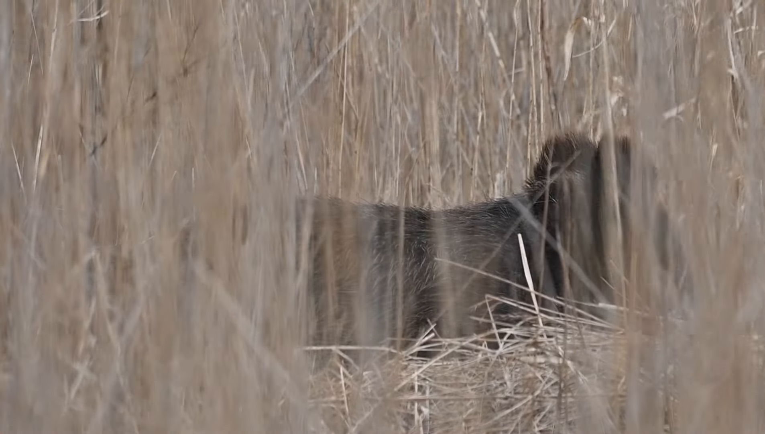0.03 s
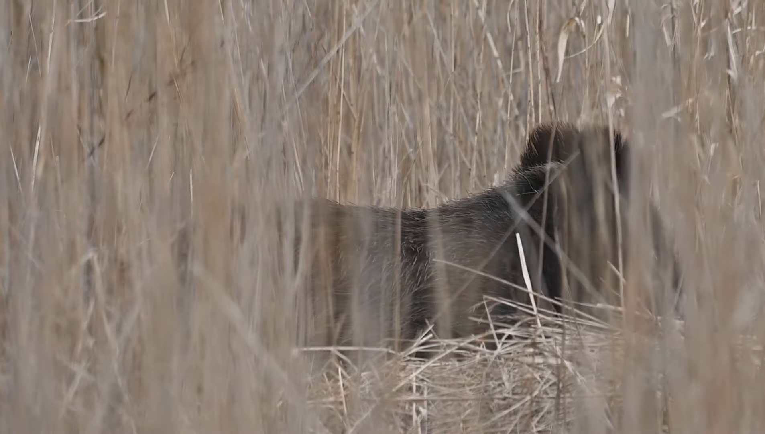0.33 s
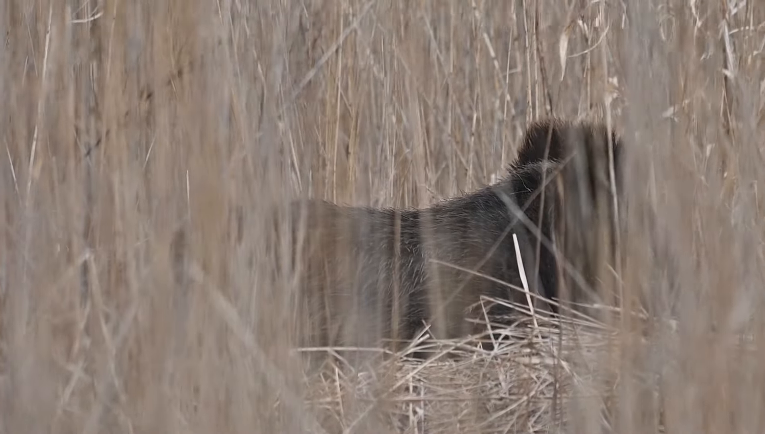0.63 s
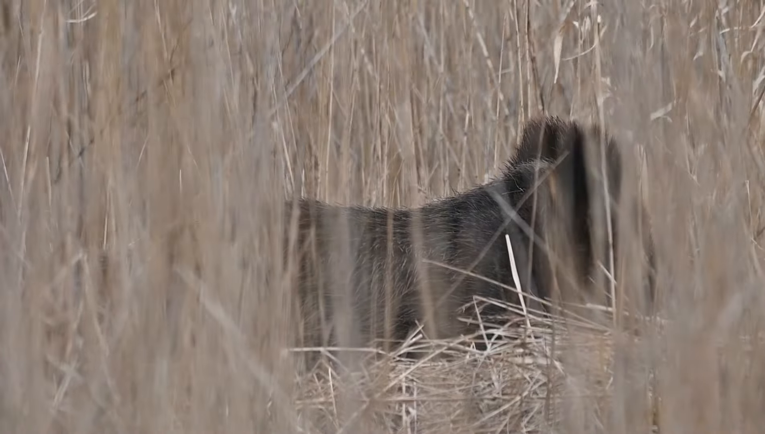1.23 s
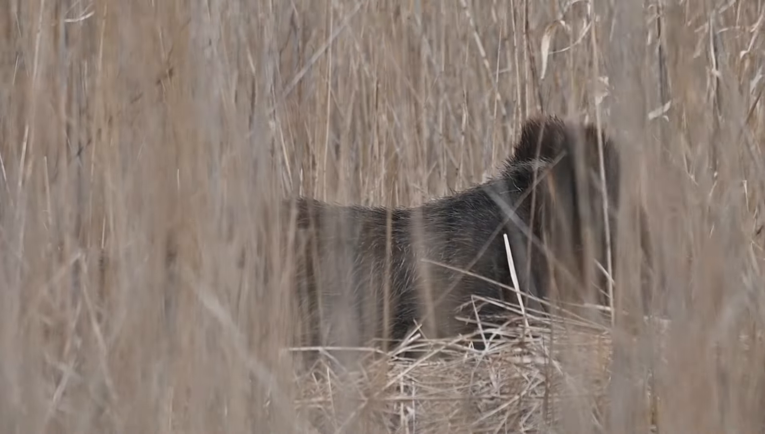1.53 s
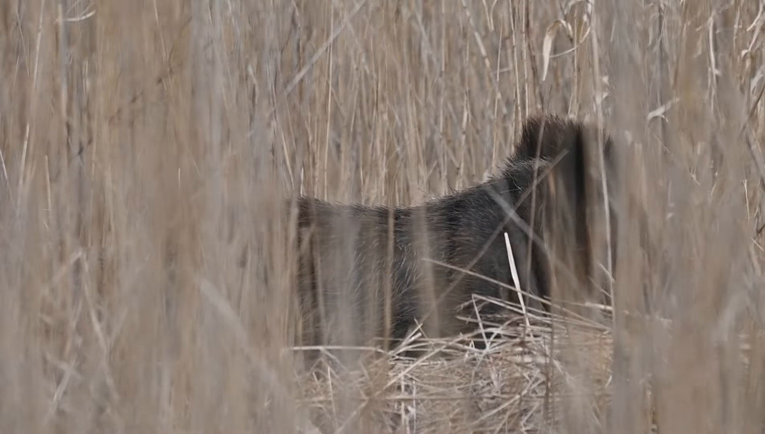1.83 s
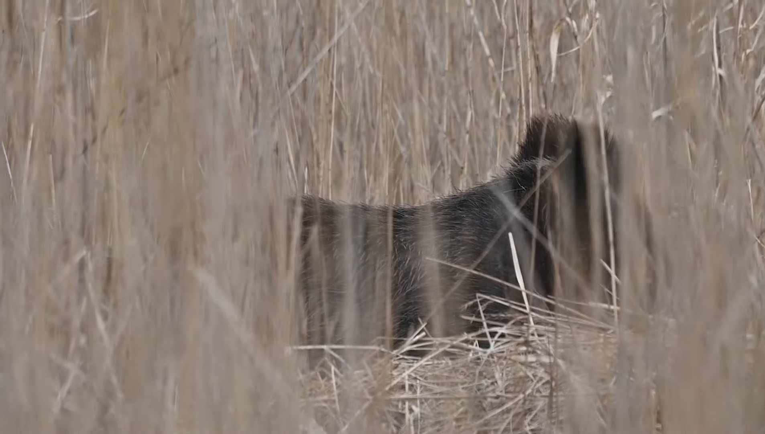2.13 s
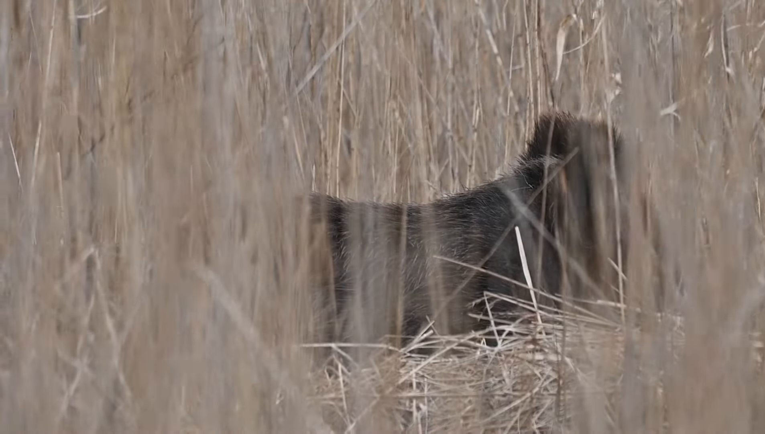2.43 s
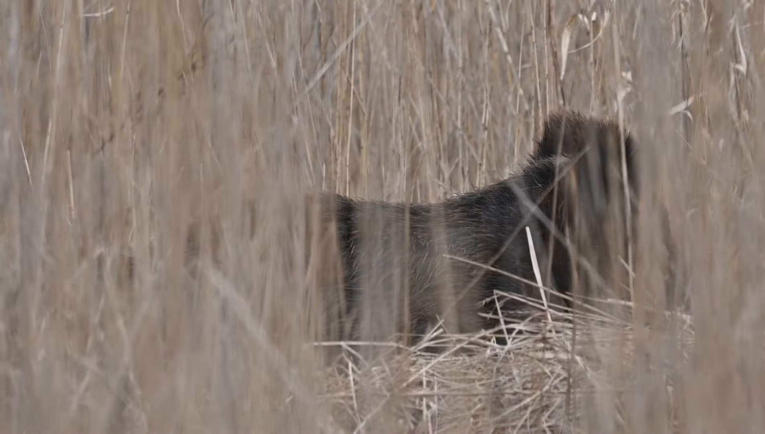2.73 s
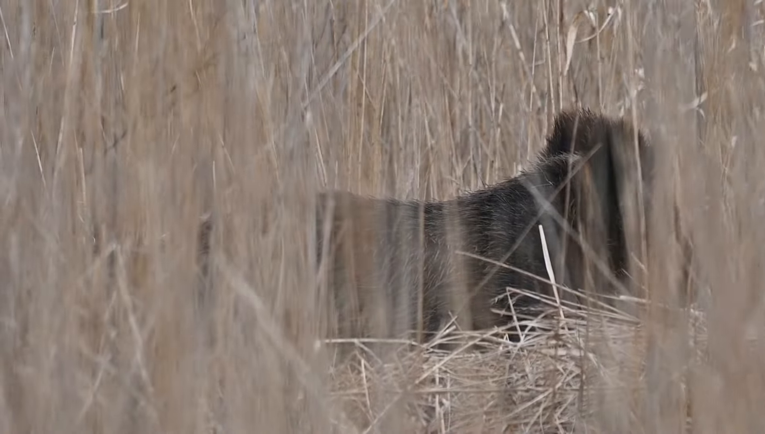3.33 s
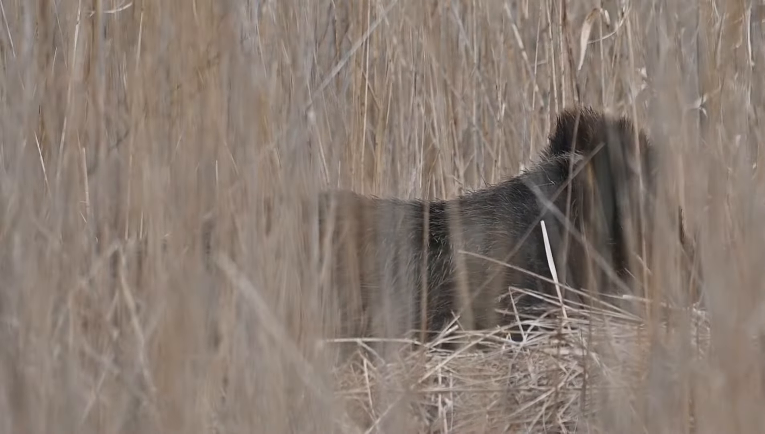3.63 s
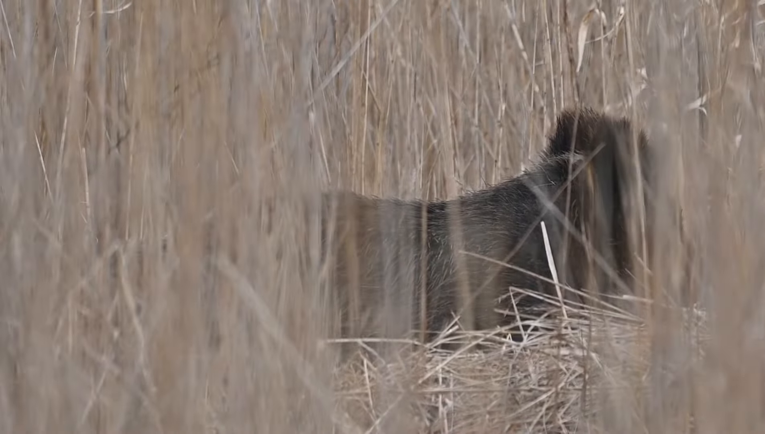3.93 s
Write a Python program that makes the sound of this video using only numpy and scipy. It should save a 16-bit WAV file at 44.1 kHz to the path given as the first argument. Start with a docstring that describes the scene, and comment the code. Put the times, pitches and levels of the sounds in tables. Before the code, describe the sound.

Light wind rumbles on the microphone in a quiet reed bed, easing at first, then gusting and thumping mostly on the right. Dry reeds swish faintly, while the camera whirs softly on the left and clicks once.

```python
"""Light gusts rumble and thump on a camera's two microphone ports, mostly the right, in a quiet reed bed.
The turbulence grows brighter as each gust strengthens. Dry reeds brush past in short, soft swishes.
On the left, the camera's mechanism whirs and buzzes faintly over microphone hiss;
its body clicks once, and there is one soft scuff of handling."""
import sys
import numpy as np
from scipy import signal
from scipy.fft import rfft, irfft
from scipy.io import wavfile

SR = 44100
rng = np.random.default_rng(int(sys.argv[2]) if len(sys.argv) > 2 else 0)


def transcribe(u):
    """Save the signal u as a 16-bit wav file named by the first command-line argument.

    u: samples, shape (n,) or (channels, n), limited to [-1, 1]; the rate is SR.
    q: integer samples, one column per channel.
    """
    v = np.clip(np.atleast_2d(u).T, -1, 1)
    q = np.round(v * 32767).astype(np.int16)
    wavfile.write(sys.argv[1], SR, q)


N = 176400
BIN_HZ = np.arange(N // 2 + 1) * SR / N


def undb(db):
    return 10 ** (np.asarray(db) / 20)


def unit(x):
    """Scale to rms 1."""
    return x / np.sqrt(np.mean(x ** 2))


def db_at(spectrum, hz):
    """Read a spectrum on a log-frequency axis."""
    points_hz, db = np.array(spectrum, float).T
    return np.interp(np.log(np.maximum(hz, 1)), np.log(points_hz), db)


def colour(x, spectrum):
    """Filter by a spectrum that falls away past its ends; rms 1."""
    hz = np.maximum(BIN_HZ, 1)
    skirts = np.minimum(hz / spectrum[0][0], 1) ** 2 * np.minimum(spectrum[-1][0] / hz, 1) ** 2
    return unit(irfft(rfft(x) * undb(db_at(spectrum, hz)) * skirts, N))


def noise():
    return rng.standard_normal(N)


def wander(rate_hz):
    """Smooth random motion; rms 1."""
    return unit(irfft(rfft(noise()) * np.exp(-.5 * (BIN_HZ / rate_hz) ** 2), N))


def decay(age, tau_s):
    """Silence before age 0, then exponential decay."""
    return (age >= 0) * np.exp(-np.maximum(age, 0) / tau_s)


def on_left(x, right_db):
    """Mono to stereo, right channel attenuated."""
    return np.outer([1, undb(right_db)], x)


# Hiss spectrum (frequency [Hz], relative density [dB])
HISS_SPECTRUM = [(30, 17.5), (150, 11), (300, 10), (650, 5), (800, -1.5), (1200, 1), (2500, -2), (5000, -3),
                 (8000, -5.5), (10500, -5), (12500, -13), (13500, -14), (14500, -25)]


def microphone_hiss(left_db=-76, right_db=-78):
    """Steady self-noise, independent in each microphone."""
    return np.array([undb(db) * colour(noise(), HISS_SPECTRUM) for db in (left_db, right_db)])


# Whirr spectrum (frequency [Hz], relative density [dB])
WHIRR_SPECTRUM = [(100, -24.5), (200, -11), (250, -18), (290, -11), (335, -4), (365, -10), (400, -3),
                  (465, 1), (525, -12.5), (570, -11), (690, -8.5), (780, -20), (1150, -29), (1300, -35),
                  (1550, -29), (2200, -53)]
# Mechanism resonances (frequency [Hz], half-width [Hz], left level [dB], right level [dB])
WHINE_RESONANCES = [(874, 27, -83.5, -82.5), (1002.5, 10, -84, -94.5), (7190, 540, -83.5, -103),
                    (9180, 400, -90, -104), (14100, 83, -94.5, -104)]


def mechanism_whirr(whirr_db=-66):
    """The camera's mechanism whirs low and whines at narrow resonances."""
    out = on_left(undb(whirr_db) * colour(noise(), WHIRR_SPECTRUM), right_db=-22)
    for hz, half_width_hz, left_db, right_db in WHINE_RESONANCES:
        resonance = 1 / (1 + ((BIN_HZ - hz) / half_width_hz) ** 2)
        for port, db in enumerate((left_db, right_db)):
            out[port] += undb(db) * unit(irfft(rfft(noise()) * resonance, N))
    return out


# Buzz spectrum per port (frequency [Hz], relative density [dB])
BUZZ_LEFT_SPECTRUM = [(2000, -28.5), (4000, -16), (4850, -9), (5500, -9), (6500, -7), (7050, 4.5),
                      (7400, -2), (7900, -21), (8700, -20), (9200, -16.5), (9800, -11.5), (11000, -14),
                      (13000, -21)]
BUZZ_RIGHT_SPECTRUM = [(6000, -52), (7200, -26), (8000, -11), (8700, 8), (9200, 20.5), (9900, -14),
                       (10800, -27), (13000, -16)]


def mechanism_buzz(t, rate_hz=119.88, offset_s=0.0047, weak_db=-3, left_db=-80.5, right_db=-89):
    """The mechanism buzzes in alternately weak and strong bursts of fine hiss."""
    cycle = (t - offset_s) * rate_hz
    bursts = decay(cycle % 1 / rate_hz, tau_s=0.0014) * undb(weak_db * (cycle % 2 < 1))
    jolt = noise()[(cycle % 2 / rate_hz * SR).astype(int)]  # repeats every two bursts
    drive = bursts * (jolt + 0.19 * noise())
    return np.array([undb(left_db) * colour(drive, BUZZ_LEFT_SPECTRUM),
                     undb(right_db) * colour(drive, BUZZ_RIGHT_SPECTRUM)])


# Scuff spectrum (frequency [Hz], relative density [dB])
SCUFF_SPECTRUM = [(250, -14), (380, -9), (600, -15), (1250, -15), (1550, 3), (1800, -5), (2100, -8),
                  (2450, -30)]


def handling_scuff(t, at_s=3.291, level_db=-66):
    """A soft, short scuff of handling near the left port."""
    scuff = colour(noise(), SCUFF_SPECTRUM) * decay(t - at_s, tau_s=0.0078)
    return on_left(undb(level_db) * scuff, right_db=-12)


# Camera body modes (frequency [Hz], relative level [dB], T60 [s])
BODY_MODES = [(570, -0.5, 0.054), (1120, 1, .028), (1424, -1, 0.028), (1490, 1.5, 0.02), (2230, -12, 0.021),
              (3100, -17, .014)]
# Crack spectrum (frequency [Hz], relative density [dB])
CRACK_SPECTRUM = [(450, 2), (900, 0), (2200, -6), (3200, -9), (6500, -5), (9000, -14), (11500, -27)]


def body_click(t, at_s=1.7476, ring_db=-55, crack_db=-53.5):
    """A sharp crack briefly rings the camera body."""
    age = t - at_s
    ring = sum(undb(db) * decay(age, t60_s / np.log(1000)) * np.sin(2 * np.pi * hz * age)
               for hz, db, t60_s in BODY_MODES)
    crack = colour(noise(), CRACK_SPECTRUM) * decay(age, tau_s=0.0013)
    return on_left(undb(ring_db) * ring + undb(crack_db) * crack, right_db=-12)


# Leaf swishes (peak time [s], level [dB], swell [s], fade [s])
REED_SWISHES = [(0.17, -79, 0.18, 0.055), (0.98, -85.5, 0.046, 0.062), (2.32, -75, 0.04, 0.014),
                (2.389, -70.5, 0.024, 0.033), (2.521, -72.5, 0.013, .012), (2.955, -73.5, 0.027, 0.014),
                (3.12, -65, 0.029, 0.013), (3.225, -71, 0.032, .018), (3.54, -69, .008, 0.024),
                (3.76, -69.5, .022, .025), (3.875, -75, 0.017, 0.04)]
# Stalk ticks (time [s], level [dB])
STALK_TICKS = [(1.793, -63), (2.419, -67), (2.43, -60.5)]
# Reed spectrum (frequency [Hz], relative density [dB])
REED_SPECTRUM = [(1200, -7.5), (2500, -9), (3050, -7), (3300, 3), (3650, -4.5), (5200, 1), (7200, 1),
                 (10000, -7), (12000, -24), (14500, -30)]


def reeds(t, grain_db=1.5, right_db=-32):
    """Dry leaves slide in grainy swishes; stalks tick now and then."""
    rub = sum(undb(db) * np.exp(-.5 * ((t - at_s) / np.where(t < at_s, swell_s, fade_s)) ** 2)
              for at_s, db, swell_s, fade_s in REED_SWISHES)
    ticks = sum(undb(db) * decay(t - at_s, tau_s=0.00084) for at_s, db in STALK_TICKS)
    grain = unit(undb(grain_db * wander(rate_hz=270)))
    envelope = rub * grain + ticks
    return np.array([colour(noise(), REED_SPECTRUM) * envelope * gain for gain in (1, undb(right_db))])


# Single eddies (time [s], level [dB], rise [s])
EDDY_THUMPS = [(2.1078, -36.5, 0.00027), (2.1302, -30, 0.00026), (2.197, -28.5, 0.00086),
               (2.300, -32.5, 0.00047), (2.342, -31.5, 0.00062), (2.38, -31.5, 0.00028),
               (2.425, -31.5, 0.00093), (2.831, -36.5, 0.00043), (2.877, -31.5, 0.00061)]
# Turbulence around each eddy (frequency [Hz], relative density [dB])
SWIRL_SPECTRUM = [(200, -2), (450, 3), (750, -3.5), (1200, -19.5), (2000, -30)]


def eddy_thumps(t, suction=0.44, relax_s=0.004, swirl_db=-22.5, swirl_s=0.0089):
    """An eddy sucks at the port, then the pressure jumps and relaxes amid a short swirl."""
    swirl = undb(swirl_db) * colour(noise(), SWIRL_SPECTRUM)
    out = np.zeros(N)
    for at_s, db, rise_s in EDDY_THUMPS:
        jump = .5 + .5 * np.tanh((t - at_s) / rise_s)
        away_s = np.hypot(t - at_s, rise_s)
        pressure = (jump - suction * (1 - jump)) * np.exp(-away_s / relax_s)
        out += undb(db) * (pressure + swirl * np.exp(-away_s / swirl_s))
    return out


# Gusts per port (time [s], level before trim [dB])
LEFT_GUSTS = [(0, -84), (0.22, -72.5), (0.38, -66.5), (0.42, -53), (0.48, -60.5), (0.8, -75), (1.7, -84),
              (1.86, -57.5), (1.899, -43.5), (2.0, -43), (2.14, -49), (2.208, -34.5), (2.29, -60),
              (2.42, -59), (2.5, -45), (2.559, -37), (2.62, -62), (3.102, -67), (3.7, -64.5), (4.0, -60.5)]
RIGHT_GUSTS = [(0, -53), (0.082, -49.5), (0.2, -67.5), (0.55, -62), (1.07, -68.5), (1.16, -73.5),
               (1.39, -76.5), (1.47, -61), (1.68, -74), (1.88, -63.5), (1.94, -42), (2.22, -40),
               (2.32, -37), (2.58, -40), (2.739, -46.5), (2.819, -41), (3.02, -39.5), (3.27, -45),
               (3.339, -41.5), (3.6, -45.5), (3.74, -50.5), (3.88, -48), (3.938, -40.5), (4.0, -42)]
# Buffeting spectrum at reference_db (frequency [Hz], relative density [dB])
BUFFET_SPECTRUM = [(20, -24), (45, -6.5), (85, 0), (125, -0.5), (190, -4), (280, -10.5), (400, -21),
                   (600, -30), (900, -46), (1500, -56), (3000, -84.5)]


def wind_buffeting(t, gusts, reference_db=-37, trim_db=0.5, calm_stretch=0.46, flicker_db=2.7):
    """Turbulence at one port: faster air makes smaller eddies and stretches the spectrum upward."""
    gust_db = np.interp(t, *np.array(gusts, float).T)
    stretch = calm_stretch + (1 - calm_stretch) * undb(gust_db - reference_db) ** 0.95
    octave = np.log2(np.maximum(BIN_HZ, 1))
    air = rfft(noise())
    eddies = wander(rate_hz=65)  # shared by all bands
    out, power = 0, 0
    for hz in 20 * 2 ** np.arange(0, 7.5, .5):  # half-octave bands
        window = np.maximum(1 - 2 * abs(octave - np.log2(hz)), 0)
        band = unit(irfft(air * window, N))
        gain = undb(db_at(BUFFET_SPECTRUM, hz / stretch)) * np.sqrt(hz)
        eddy_db = 2 * min(hz / 250, 1.6)
        flutter_db = eddy_db * eddies + flicker_db * wander(rate_hz=16)
        out += band * gain * undb(flutter_db)
        power += gain ** 2
    return unit(out / np.sqrt(power)) * undb(gust_db + trim_db)


def scene():
    """Hiss, camera, reeds and wind as (left, right)."""
    t = np.arange(N) / SR
    wind = np.array([wind_buffeting(t, LEFT_GUSTS), wind_buffeting(t, RIGHT_GUSTS) + eddy_thumps(t)])
    camera = mechanism_whirr() + mechanism_buzz(t) + handling_scuff(t) + body_click(t)
    return microphone_hiss() + camera + reeds(t) + wind


def record(dry):
    """Steep elliptic low-pass on the top treble."""
    cutoff_hz = 14450
    return signal.sosfilt(signal.ellip(8, .2, 70, cutoff_hz, fs=SR, output="sos"), dry)


dry = scene()
out = record(dry)
transcribe(out)
```